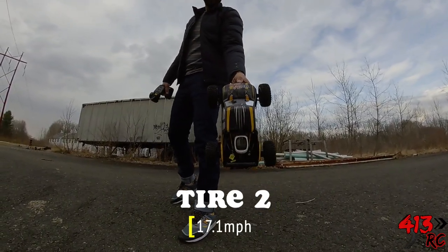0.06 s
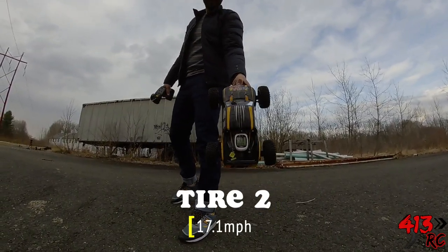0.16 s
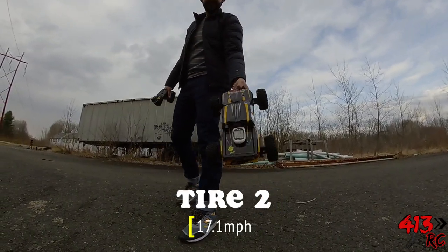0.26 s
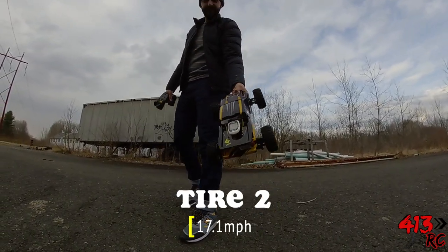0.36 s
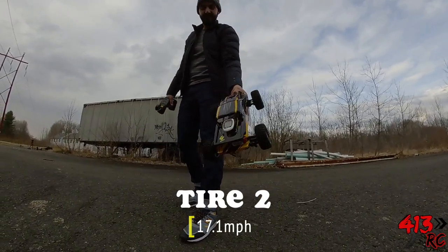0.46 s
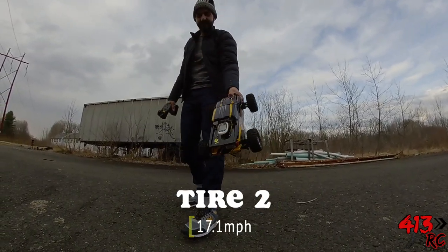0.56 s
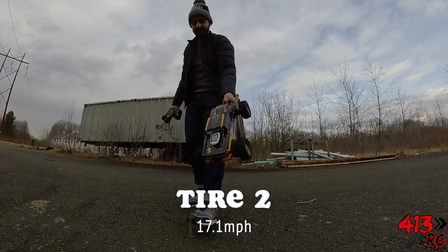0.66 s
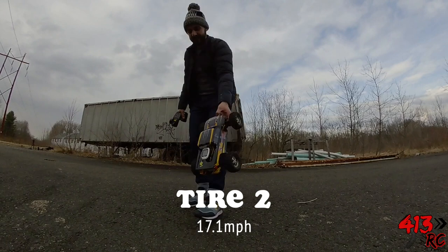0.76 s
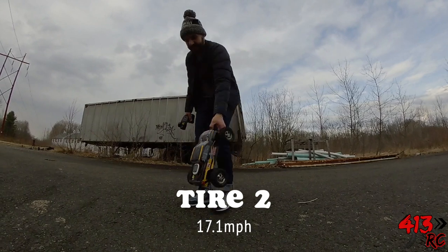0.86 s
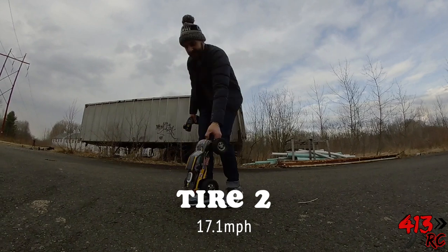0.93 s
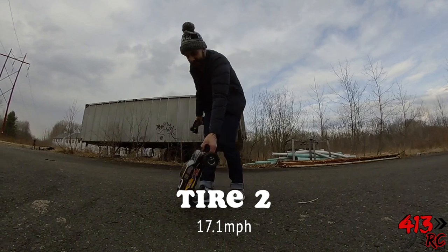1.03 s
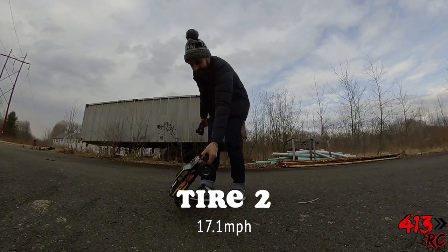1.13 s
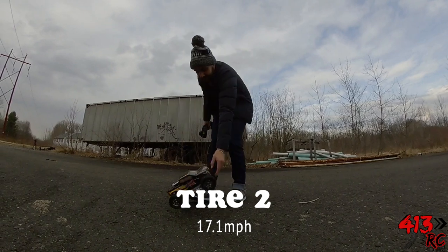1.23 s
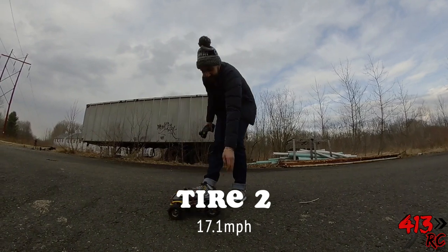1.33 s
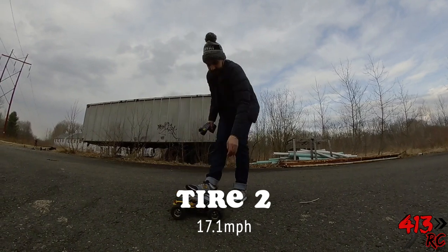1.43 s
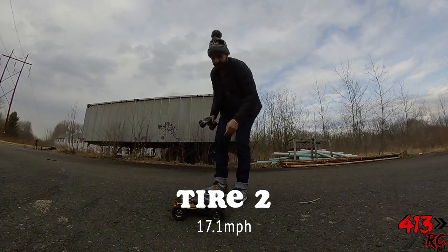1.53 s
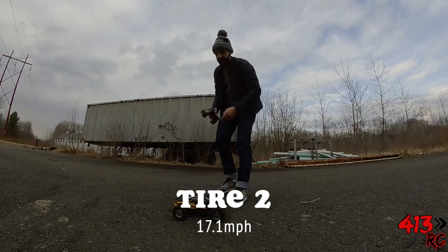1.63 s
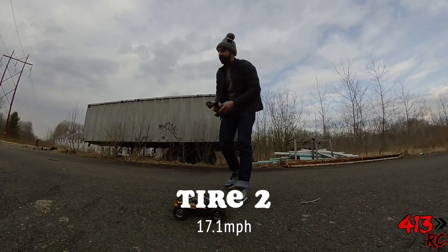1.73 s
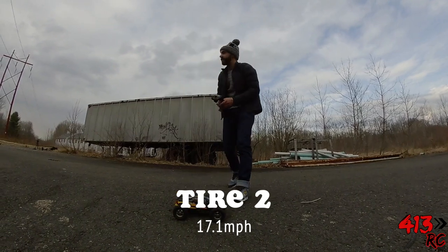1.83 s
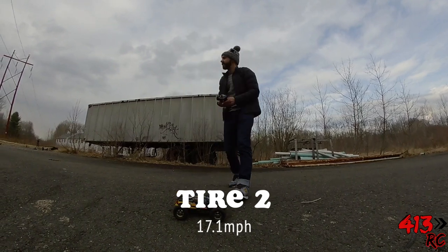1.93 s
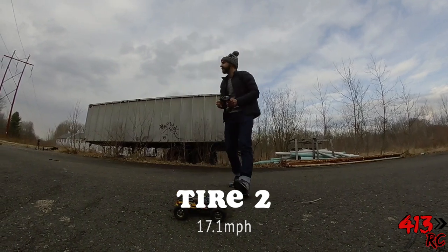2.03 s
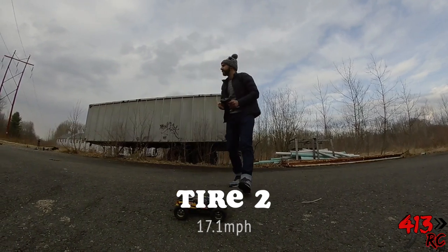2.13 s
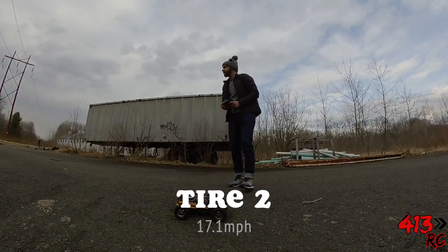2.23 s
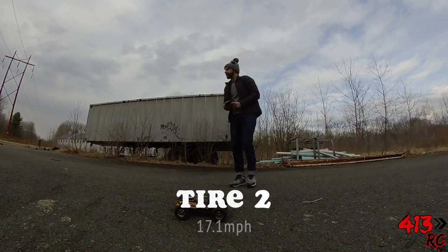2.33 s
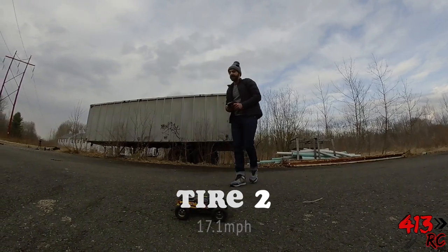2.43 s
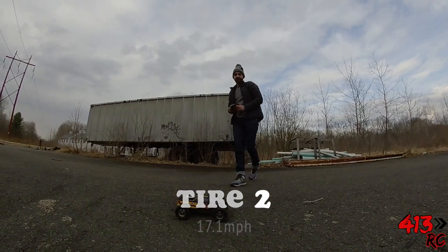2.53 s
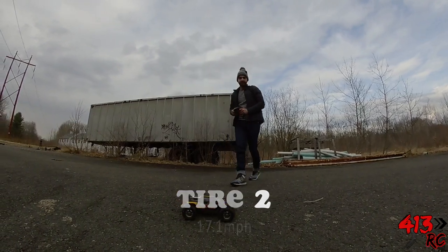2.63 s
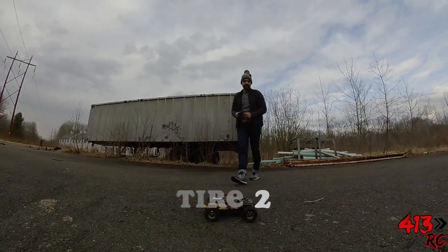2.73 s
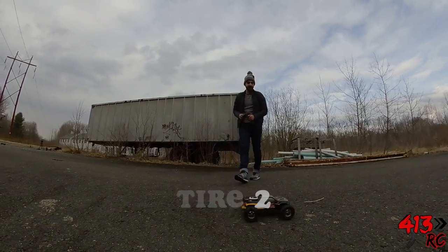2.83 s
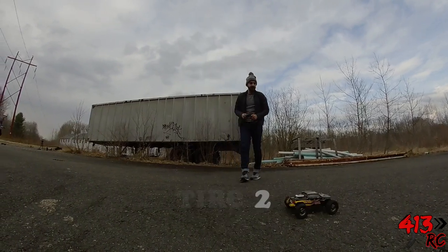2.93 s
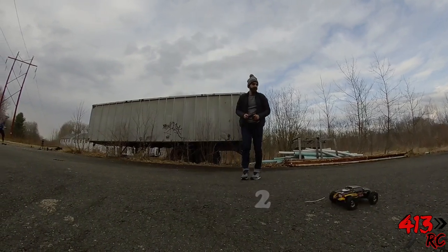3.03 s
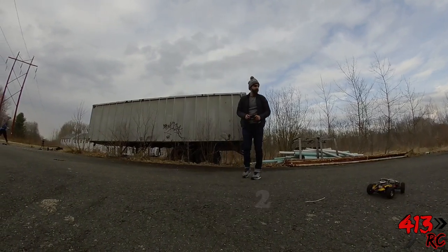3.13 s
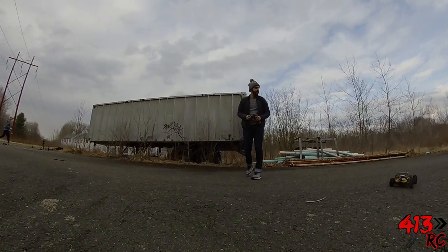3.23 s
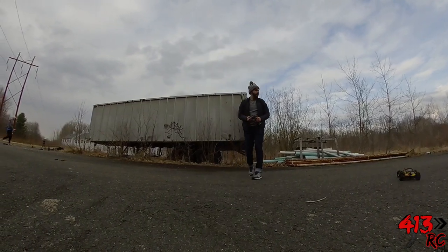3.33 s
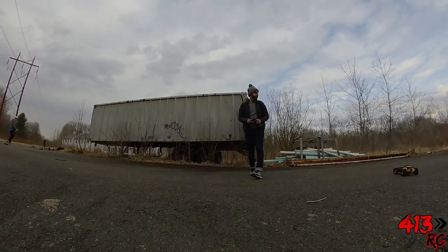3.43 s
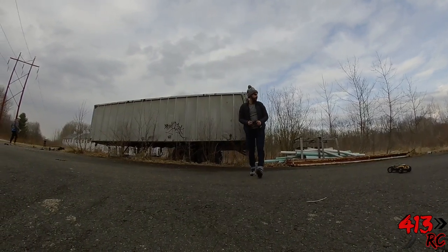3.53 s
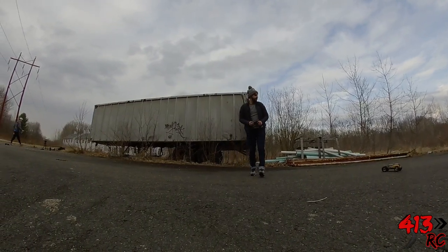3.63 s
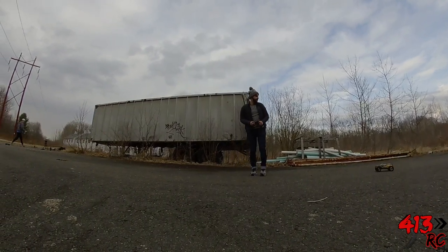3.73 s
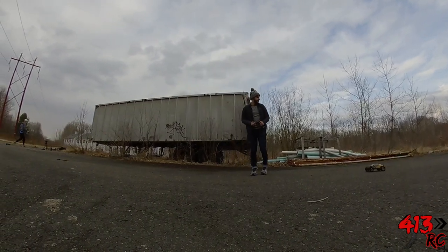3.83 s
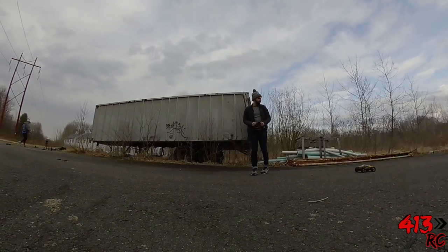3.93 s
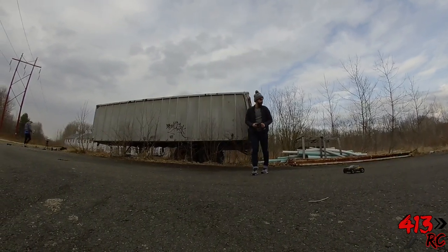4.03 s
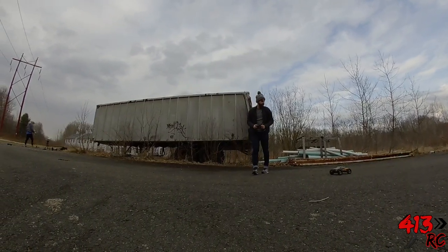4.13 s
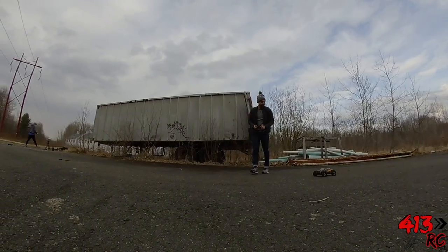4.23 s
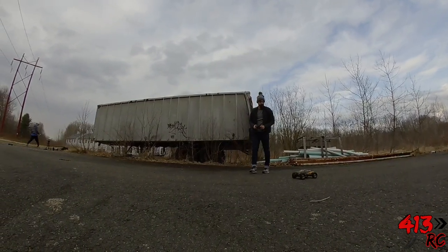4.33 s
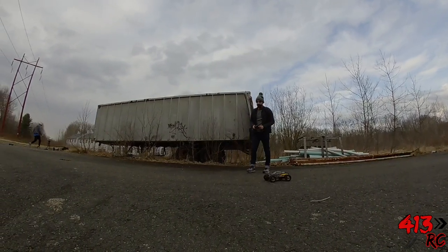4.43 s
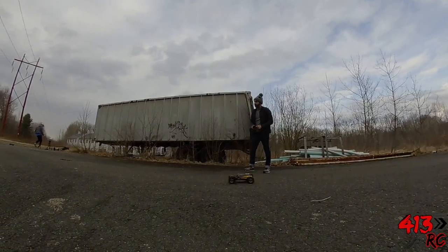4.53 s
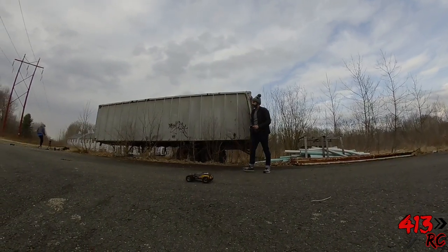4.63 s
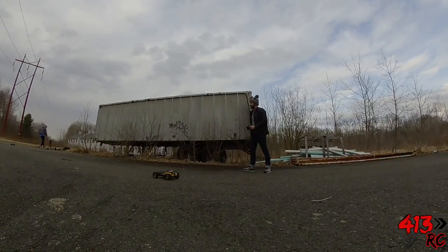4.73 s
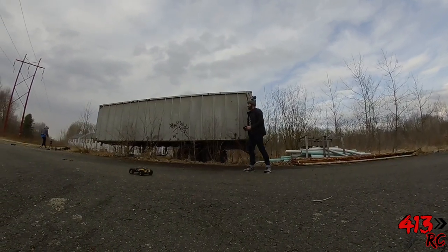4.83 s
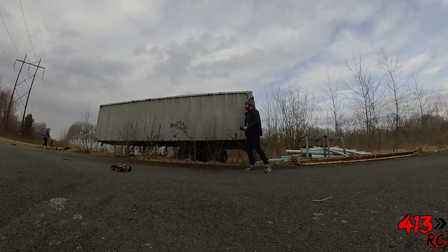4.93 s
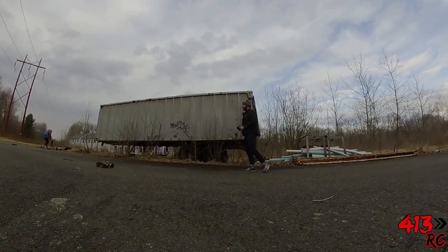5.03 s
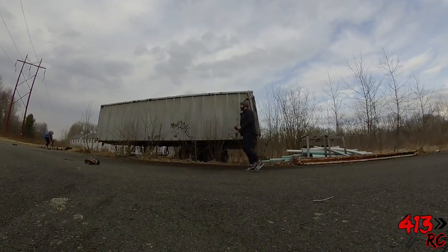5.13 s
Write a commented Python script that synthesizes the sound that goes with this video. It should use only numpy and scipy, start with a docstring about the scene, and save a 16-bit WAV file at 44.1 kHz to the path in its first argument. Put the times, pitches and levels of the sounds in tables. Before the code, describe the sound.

A small remote-controlled truck is dropped on its wheels, then its electric motor whines away in bursts over gritty asphalt.

```python
"""Outdoors on gritty asphalt, a radio-controlled truck is carried, dropped on its wheels and driven off.
Far traffic hums, the driver's jacket rustles and shoes crack grit. Loose plastic clacks, and the landing
rings the truck's frame. The brushless motor buzzes at standstill, then the gear teeth whine up, coast
through a turn and whine up again. The tyres roar, flick grit and thump over bumps."""
import sys
import numpy as np
from scipy.fft import rfft, irfft, next_fast_len
from scipy.io import wavfile
from scipy.ndimage import uniform_filter1d, map_coordinates

SR = 44100
rng = np.random.default_rng(int(sys.argv[2]) if len(sys.argv) > 2 else 0)


def store_pcm(level_fs):
    """Save levels as 16-bit WAV."""
    pcm = np.round(np.clip(level_fs, -1, 1) * 32767).astype(np.int16)
    wavfile.write(sys.argv[1], SR, np.atleast_2d(pcm).T)


N = 227688

# Tone colours: how strong the lows and highs of a sound are. Each row: frequency in Hz, level in dB.
TRAFFIC_TONE = [(100, -24.5), (200, 6.5), (270, 1.5), (340, 2.5), (600, -2), (1000, -1.5), (2000, -15.5),
                (4000, -62), (10000, -56)]
HUM_TONE = [(20, -28), (45, -16), (70, -8), (105, -13.5), (130, -7.5), (148, 0), (175, -4.5), (230, -11),
            (400, -29.5), (1000, -89)]
JACKET_TONE = [(800, -2.5), (2000, 2.5), (3500, -0.5), (5500, -4.5), (8300, 0.5), (10000, -9.5),
               (12500, -7), (13500, -25), (16000, -32)]
CLICK_TONE = [(300, -16), (1200, -0.5), (2200, 2.5), (4200, 4.5), (6000, -0.5), (8300, 3), (10500, -27),
              (14000, -36), (16000, -39)]
PLASTIC_TONE = [(40, -29), (150, -7), (500, -2.5), (1000, -10), (1400, 3), (1900, -5), (2400, -9),
                (2900, -6.5), (4000, -14), (8000, -17), (11000, -39), (14000, -23), (16000, -51)]
SOLE_TONE = [(40, -21), (100, -17), (260, 5.5), (600, 5.5), (1200, 0), (2500, -7), (4500, -11.5),
             (8000, -18), (12000, -32)]
THUD_TONE = [(25, -13), (70, -19), (130, -11), (350, 0.5), (520, 9), (740, 6.5), (1000, -4), (1500, -5),
             (3000, -14), (8500, -18), (11000, -37)]  # wheels and frame hitting the ground
SHELL_TONE = [(150, -25), (700, -8), (1300, 7), (1950, 2), (2600, -1), (3400, -2), (4300, -2.5),
              (6000, -10.5), (8500, -8.5), (11000, -31), (14200, -19), (16000, -26)]  # the plastic body
SUSPENSION_TONE = [(40, -45), (100, -10), (300, -3.5), (700, -3), (1000, 2.5), (1450, -1), (2000, -23),
                   (3800, -13.5), (5000, -34), (8500, -23), (12000, -38)]
JUDDER_TONE = [(60, -22), (150, 5.5), (300, -14), (480, 5), (800, -2), (1700, -10), (2800, -25),
               (8000, -32)]  # the frame shaken by the motor
GEARBOX_TONE = [(450, -26), (800, -6), (1130, 3), (1600, 4), (2000, -7.5), (2550, 1), (3200, 7),
                (4300, -28), (5100, -18), (5750, -11.5), (6400, -5), (7100, -10), (7900, 4), (9200, -4.5),
                (10200, -10), (11500, -25), (14200, -6), (18000, -47)]
TYRE_TONE = [(88, -47.5), (150, -14), (285, -13), (451, 1), (725, -7.5), (1100, -14.5), (1430, -31),
             (2420, -120)]
RATTLE_TONE = [(60, -48), (450, -14), (750, -1.5), (1100, 0), (1550, -1), (2100, -6), (2600, -9),
               (3100, -10), (4000, -18.5), (5200, -20), (7000, -29), (12000, -41.5)]  # the frame shaken by grit
HISS_TONE = [(100, -33), (3000, -3), (5000, -6.5), (6200, -2), (7200, 0.5), (8000, 3), (8800, -1.5),
             (10000, -16), (11700, -25.5), (13000, -15), (14000, -9), (15000, -22), (16000, -19)]  # the spinning drive parts
MICROPHONE_TONE = [(20, -10), (45, -16), (68, -21.5), (95, -11.5), (130, 0)]
# The tone colour of flying grit. Each row: multiple of the centre frequency, level in dB.
SPRAY_TONE = [(.1, -30), (.6, -16), (1, 6.5), (1.35, -9), (1.7, -24), (2.6, -21)]

# The notes a part rings at when struck. Each row: pitch in Hz, level in dB, seconds to fade by 60 dB.
PANEL_NOTES = [(1480, 0, .03), (2080, -3, .025), (2950, -9, .025)]
HEEL_NOTES = [(230, -2, 0.076), (333, 4, 0.049), (650, -12, .04)]
FRAME_NOTES = [(145, -0.5, 0.057), (259.4, -13, 0.18), (423, -7.5, 0.18), (605, 6.5, 0.041),
               (700, 2, 0.057), (825, 1.5, 0.041), (1252, -3.5, 0.1), (1435, -4, 0.052), (1650, 0, 0.04),
               (1930, 3, 0.024), (2200, -4.5, .04), (3380, -2.5, 0.025), (4400, -21, 0.049)]
LINK_NOTES = [(1640, 0, 0.033), (1730, -5, 0.037), (2680, -4, 0.032)]

# Single hits. Each row: start in seconds, level in dB.
SHARP_CLICKS = [(.082, -39), (.141, -41), (.277, -45), (.430, -41.5), (.468, -38), (.474, -39.5),
                (.662, -34.5), (.665, -39.5), (1.101, -42), (1.139, -47.5), (1.225, -44), (1.8996, -44.5),
                (1.951, -36.5), (1.9704, -39), (2.054, -38), (2.0585, -31.5)]  # grit underfoot and the carried truck's plastic
PLASTIC_CLACKS = [(1.003, -34.5), (1.225, -40), (1.8996, -40), (2.3675, -39), (2.91, -26), (3.5805, -22.5),
                  (3.667, -33), (3.734, -33), (4.916, -29.5), (5.054, -20.5)]
SHELL_SLAPS = [(1.378, -19.5), (1.3895, -21), (1.3915, -21.5), (1.4008, -21), (1.403, -20)]  # the body slaps the frame
MOTOR_JERKS = [(2.551, -35.5), (2.564, -36), (2.581, -39), (2.588, -34.5), (2.602, -37), (2.617, -35)]
TYRE_CRACKS = [(2.7252, -39), (2.7546, -35), (3.1946, -34), (3.2574, -37), (3.4934, -34), (3.8047, -30),
               (3.91, -21.5), (4.5909, -23), (4.7032, -39), (4.791, -42)]  # stones under tyres
TYRE_BUMPS = [(2.871, -22), (3.194, -20), (3.283, -24), (3.324, -24), (4.246, -23.5)]

# The jacket moves. Each row: middle in seconds, half length in seconds, level in dB.
JACKET_RUSTLES = [(-0, 0.029, -56), (0.718, 0.56, -62.5), (1.524, 0.19, -61.5), (1.779, 0.03, -59),
                  (1.983, 0.19, -63.5)]
# Shoes land. Each row: start in seconds, sole level in dB, heel level in dB.
FOOTSTEPS = [(1.265, -42.5, -68), (1.852, -44, -41.5), (2.072, -27, -45), (2.136, -41.5, -48)]
# Wheels and frame hit the ground. Each row: start in seconds, level in dB, extra ringing in dB.
LANDING_BLOWS = [(1.3545, -42, 9), (1.358, -32.5, 2), (1.3695, -24, 6.5), (1.378, -22, 5.5),
                 (1.3867, -18.5, 3), (1.3895, -17, 7), (1.3925, -14.5, 1.5), (1.4055, -25, 1),
                 (1.415, -21, -16), (1.44, -35, 2), (1.475, -41, 6)]
# The suspension knocks. Each row: start in seconds, level in dB, loss per bounce in dB.
SUSPENSION_KNOCKS = [(1.529, -33, 0.5), (2.722, -18.5, 9), (3.011, -22, 2), (3.766, -38, 2),
                     (3.9134, -18, 12), (4.177, -29, 6), (4.246, -32.5, 2)]

# The tones in the motor's buzz and the gears' rasp. Each row: multiple of the base pitch, level in dB.
COIL_HARMONICS = [(1, -5.5), (2, -17), (3, -27), (5, -18), (7, -29)]
RASP_HARMONICS = [(2, -2), (3, -5.5), (4, -4.5), (5, -6.5), (6, -8), (7, -8), (8, -7), (9, -16)]
# How often gear teeth meet as the truck starts, coasts and speeds up. Each row: time in seconds, rate in Hz.
TOOTH_RATE = [(2.61, 450), (2.64, 660), (2.675, 1180), (2.74, 1680), (2.81, 1880), (2.88, 2340),
              (2.955, 2690), (3.11, 2680), (3.3, 2000), (3.66, 1030), (3.695, 1150), (3.71, 1410),
              (3.80, 2060), (4.0, 2580), (4.17, 2680), (4.33, 2740), (4.46, 3000), (4.55, 3310),
              (4.8, 2730), (4.93, 3050), (5.16, 3350)]
# The truck's path. Each row: time in seconds, distance in metres.
TRUCK_PATH = [(2.6, 1.12), (2.85, 1.18), (3.05, 1.2), (3.3, 1.77), (3.65, 2.72), (4.0, 2.04), (4.3, 2.36),
              (4.55, 1.89), (4.8, 2.75), (5.16, 3.7)]
# Squeezes of the throttle. Each row: start in seconds, length in seconds, whine level in dB,
# its fade in dB per second, rasp level in dB.
SQUEEZES = [(2.632, .451, -29.5, 8, -37), (3.68, .88, -31.5, 5, -39.5), (4.804, .4, -34, 4, -37.5)]
# Spinning tyres grip and drag the motor down. Each row: middle in seconds, half length in seconds,
# share of speed lost, extra whine in dB.
TYRE_BITES = [(2.679, .012, .02, 6), (2.72, .0099, .099, 0.5), (2.757, .012, .13, 5.5),
              (2.829, .011, .17, 1), (2.849, .01, .08, 0), (2.892, .011, .15, 7.5), (2.924, .014, .15, 7.5),
              (2.974, .011, .15, 9.5), (3.015, .014, .10, 6), (3.06, .016, .068, 6.5),
              (3.731, .011, .17, 7), (3.774, .011, .17, 6), (3.816, .012, .13, 12.5),
              (3.889, .012, .15, 12.5), (3.934, .01, .11, 9), (3.968, .013, .13, 10.5),
              (4.015, .011, .11, 11), (4.066, .028, .04, 7.5), (4.114, .02, .087, 9),
              (4.237, .025, .038, 4), (4.333, .012, .061, 8.5)]
# Wheels lift and the gears go quiet. Each row: middle in seconds, half length in seconds, change in dB.
WHEEL_LIFTS = [(3.86, .012, -4), (4.15, 0.013, -5), (4.288, 0.018, -6), (4.376, 0.019, 0), (4.55, .07, -7),
               (4.868, 0.031, -8), (5.12, .04, -3)]
# Rough ground and turns. Each row: middle in seconds, half length in seconds, roar change in dB,
# rattle change in dB.
ROUGH_PATCHES = [(2.795, 0.031, 2, 5.5), (3.17, 0.11, 1, 0.5), (3.505, 0.11, 2, 3.5), (3.981, 0.22, -5, 2),
                 (4.575, 0.065, 4.5, 6.5)]
# Tyres throw grit. Each row: middle in seconds, half length in seconds, level in dB, centre frequency in Hz.
GRIT_SPRAYS = [(2.858, .03, -50, 5950), (2.925, 0.017, -43, 6400), (3.195, 0.01, -38.5, 7200),
               (3.26, 0.0085, -47.5, 5900), (3.377, 0.25, -53, 5800), (3.508, 0.011, -52, 5900),
               (4.05, 0.023, -47.5, 5850), (4.373, 0.0098, -45.5, 5460), (4.441, 0.046, -50.5, 4680),
               (4.672, 0.01, -41, 7400), (5.144, 0.062, -45.5, 7130)]

ROLL_S, ROLL_RISE_S = 2.646, 0.082  # the wheels get going
CRUISE_HZ = 2504  # the tooth rate that counts as speed 1


def amp(db):
    """Turn decibels into a number to multiply a sound by."""
    return 10 ** (np.asarray(db) / 20)


def unit(x):
    """Scale a sound so its average strength (rms) is 1."""
    return x / np.sqrt(np.mean(x ** 2) + 1e-20)


def along(points, hz):
    """Read a tone colour's level in dB at any frequency."""
    freqs, levels = np.transpose(points)
    return np.interp(np.log(hz + 1), np.log(freqs + 1), levels)


def curve(rows):
    """Join (time, value) points with straight lines, one value per sample."""
    return np.interp(np.arange(N) / SR, *np.transpose(rows))


def wobble(rate):
    """A smooth random curve with `rate` new values a second."""
    return map_coordinates(rng.standard_normal(N // 8), [np.arange(N) * rate / SR], mode="wrap")


def gate(s, length, attack, release):
    """Fade in, hold from time s, fade out; attack and release are seconds per tenfold change."""
    t = np.arange(N) / SR
    return 10 ** (np.minimum(t - s, 0) / attack - np.maximum(t - s - length, 0) / release)


def swell(s, width):
    """A bell-shaped rise and fall around time s."""
    return np.exp(-((np.arange(N) / SR - s) / width) ** 2)


def coloured(x, tone):
    """Filter a sound to give it a tone colour."""
    size = 2 * next_fast_len(N // 2 + 8192)
    gain = unit(amp(along(tone, np.fft.rfftfreq(size, 1 / SR))))
    # these steps make the filter ring only after a hit, never before it
    cepstrum = irfft(np.log(np.maximum(gain, 1e-6)))
    cepstrum[1:size // 2] *= 2
    cepstrum[size // 2 + 1:] = 0
    return irfft(rfft(x, size) * np.exp(rfft(cepstrum)))[:N]


def noise(tone):
    """Steady noise with a tone colour, at strength 1."""
    return unit(coloured(rng.standard_normal(N), tone))


def grains(rate, spread_db):
    """Tiny random clicks of uneven size, about `rate` a second."""
    hit = rng.random(N) < rate / SR
    return unit(hit * rng.choice([-1, 1], N) * amp(spread_db * np.minimum(rng.exponential(size=N), 4)))


def add(track, s, sound):
    """Mix a sound in at time s."""
    part = track[round(s * SR):][:len(sound)]
    part += sound[:len(part)]


def contacts(rows, tone, t60, tail_db, tail_t60, snap):
    """Each hit is a snap, a burst of noise and a faint tail; t60 is the seconds to fade by 60 dB."""
    track, t = np.zeros(N), np.arange(SR // 2) / SR
    for s, db, *_ in rows:
        fade = amp(-60 * t / t60) + amp(tail_db - 60 * t / tail_t60)
        burst = fade * rng.standard_normal(len(t))
        add(track, s, amp(db) * (snap * (t == 0) + burst))
    return coloured(track, tone)


def bounces(s, db, gap, loss_db, count):
    """List quick, slightly uneven hits, each weaker than the last."""
    return [(s + gap * (k + rng.uniform(-.25, .25) * (k > 0)), db - loss_db * k) for k in range(count)]


def tap(s, db, notes, rise):
    """One tap makes a part ring at its own fading notes."""
    age = np.maximum(np.arange(N) / SR - s, 0)
    ring = sum(amp(level - 60 * age / t60) * np.sin(2 * np.pi * hz * age) for hz, level, t60 in notes)
    return amp(db) * (1 - np.exp(-age / rise)) * ring


def distance_db():
    """The farther away the truck is, the quieter it sounds."""
    return -20 * np.log10(np.maximum(curve(TRUCK_PATH), .5))


def traffic():
    """Far traffic makes a soft rush with a throbbing low hum."""
    rush = amp(-61 + 0.5 * wobble(25)) * noise(TRAFFIC_TONE)
    hum = amp(-60 + 0.97 * wobble(16)) * noise(HUM_TONE)
    return rush + hum


def jacket(resting_db=-68):
    """A padded jacket creases and rustles, louder when the driver moves."""
    creases = grains(200, spread_db=4) + 2.5 * rng.standard_normal(N)
    moves = sum(amp(db) * swell(s, width) for s, width, db in JACKET_RUSTLES)
    level = np.hypot(amp(resting_db), moves) * amp(0.15 * wobble(24.2))
    return level * unit(coloured(creases, JACKET_TONE))


def sharp_clicks():
    """Grit underfoot and the carried truck's plastic make sharp clicks."""
    return amp(-8.5) * contacts(SHARP_CLICKS, CLICK_TONE, t60=0.01, tail_db=-11.5, tail_t60=0.14, snap=3.8)


def loose_plastic():
    """The body clatters as the truck is swung down; loose parts clack and ring the panels."""
    clatter = bounces(s=.9355, db=-26.5, gap=0.005, loss_db=0.3, count=10)
    hits = PLASTIC_CLACKS + clatter
    clacks = contacts(hits, PLASTIC_TONE, t60=0.033, tail_db=-27, tail_t60=0.79, snap=1.6)
    panels = sum(tap(s, db, PANEL_NOTES, rise=.0005) for s, db in PLASTIC_CLACKS)
    return amp(-13.5) * clacks + amp(-11) * panels


def shoes():
    """Soles land and heels thump the ground."""
    soles = contacts(FOOTSTEPS, SOLE_TONE, t60=0.019, tail_db=-24, tail_t60=0.23, snap=10.8)
    heels = sum(tap(s, db, HEEL_NOTES, rise=0.0022) for s, _, db in FOOTSTEPS)
    return amp(-7.5) * soles + heels


def landing(tyre_give_s=0.00066):
    """The wheels land one by one and ring the frame; the body slaps down as the springs run out."""
    ring, t = np.zeros(N), np.arange(SR // 2) / SR
    hz, level, t60 = np.transpose(FRAME_NOTES)[:, :, None]
    soft_start = 1 - np.exp(-t / tyre_give_s)  # rubber softens each blow
    for s, db, extra_db in LANDING_BLOWS:
        strength, detune, side = rng.standard_normal((3, len(FRAME_NOTES), 1))
        fades = amp(level + 2 * strength - 60 * t / t60)
        notes = np.sign(side) * fades * np.sin(2 * np.pi * hz * (1 + 0.018 * detune) * t)
        add(ring, s, amp(db + extra_db) * soft_start * notes.sum(axis=0))
    thuds = contacts(LANDING_BLOWS, THUD_TONE, t60=0.03, tail_db=-16, tail_t60=0.15, snap=0.74)
    slaps = contacts(SHELL_SLAPS, SHELL_TONE, t60=0.032, tail_db=-14, tail_t60=0.19, snap=1.0)
    return amp(-14) * ring + amp(-7) * (thuds + slaps)


def suspension():
    """Each knock of the suspension is four quick bounces."""
    hits = []
    for s, db, loss_db in SUSPENSION_KNOCKS:
        hits += bounces(s, db, gap=0.0045, loss_db=loss_db, count=4)
    return amp(-8.5) * contacts(hits, SUSPENSION_TONE, t60=0.03, tail_db=-18.5, tail_t60=0.23, snap=5.8)


def steering_link():
    """The steering link ticks as it takes up its slack."""
    return tap(s=2.368, db=-46, notes=LINK_NOTES, rise=0.00036)


def motor_start(start_s=2.525, end_s=2.71, coil_hz=1114, sag_hz_per_s=250, ring_hz=1110):
    """Pulsed coils sing while the motor jerks against the gears, ringing them and shaking the frame."""
    age = np.maximum(np.arange(N) / SR - start_s, 0)
    phase = 2 * np.pi * np.cumsum(coil_hz - sag_hz_per_s * age) / SR
    level = amp(-45 - 45 * age) * gate(start_s + 0.017, end_s - start_s, attack=0.021, release=.02)
    stutter = amp(5 * wobble(120))
    sound = level * stutter * np.sqrt(2) * sum(amp(db) * np.sin(k * phase) for k, db in COIL_HARMONICS)
    t = np.arange(SR // 8) / SR
    ring = amp(7 - 60 * t / 0.023) * (1 - np.exp(-t / 0.0015)) * np.sin(2 * np.pi * ring_hz * t)
    for s, db in MOTOR_JERKS:
        add(sound, s, amp(db) * ring)
    judder = contacts(MOTOR_JERKS, JUDDER_TONE, t60=0.028, tail_db=-22, tail_t60=0.13, snap=1.6)
    return sound + amp(-11) * judder


def tooth_load(rasp_lag_s=0.062):
    """Whine and rasp levels in dB: each squeeze presses the teeth, less as the truck catches up."""
    t = np.arange(N) / SR
    whine, rasp = np.full((2, N), 1e-6)
    for s, length, db, fade_db, rasp_db in SQUEEZES:
        whine += amp(db - fade_db * (t - s)) * gate(s, length, attack=0.094, release=0.049)
        rasp += amp(rasp_db) * gate(s + rasp_lag_s, length, attack=0.11, release=0.038)
    return 20 * np.log10([whine, rasp]) + distance_db()


def grip_db(speed, lead_s=.008, hop_lag_s=0.025):
    """The whine grows when the tyres bite, and drops when they slip, hop or lift."""
    slip = -7.5 * speed ** 2
    bites = sum(db * swell(s - lead_s, width) for s, width, _, db in TYRE_BITES)
    hops = -3.5 * sum(swell(s + hop_lag_s, 0.0034) for s, *_ in TYRE_BITES)
    lifts = sum(db * swell(s, width) for s, width, db in WHEEL_LIFTS)
    return slip + bites + hops + lifts


def gear_whine(flutter_db=2.5, rasp_db_per_octave=9):
    """Meeting teeth make a tone that the gearbox colours; their chatter smears its overtones to a rasp."""
    drag = sum(share * swell(s, width) for s, width, share, _ in TYRE_BITES)
    steady_hz = uniform_filter1d(curve(TOOTH_RATE), size=300) * (1 - drag)
    speed = steady_hz / CRUISE_HZ
    load_db, chatter_db = tooth_load()
    # bumps shake the pitch and the level, more so at speed
    hz = steady_hz * (1 + speed ** 2 * (.009 * wobble(70) + .012 * wobble(900)) + .012 * wobble(400))
    rough_db = 3.2 * wobble(300) + flutter_db * np.minimum(speed, 1) * wobble(70)
    phase = 2 * np.pi * np.cumsum(hz) / SR
    # the second harmonic grows with load; at speed the third takes over
    second_db = -7 + .7 * (load_db + 31) - 10 * np.maximum(speed - .7, 0)
    third_db = -6 + 16 * np.minimum(np.log2(speed / 0.82), 0)
    harmonics = [(1, 0), (2, second_db), (3, third_db)]
    tones = sum(amp(db + along(GEARBOX_TONE, k * hz)) * np.sin(k * phase) for k, db in harmonics)
    whine = amp(load_db + grip_db(speed) + rough_db) * tones
    off_centre = 1 + .35 * np.sin(phase / 13 + wobble(25))  # the gears press harder once a turn
    rasp = np.zeros(N)
    for k, db in RASP_HARMONICS:
        width_hz = 14 * k ** 3.1  # higher overtones smear wider
        smear = wobble(width_hz) * np.sin(k * phase) + wobble(width_hz) * np.cos(k * phase)
        rasp += amp(db + along(GEARBOX_TONE, k * hz)) * smear
    rasp_db = chatter_db + rasp_db_per_octave * np.log2(speed) + 0.5 * wobble(40)
    return off_centre * (whine + amp(rasp_db) * rasp)


def rolling():
    """Tread roars on the asphalt, grit rattles the frame and the drive parts hiss."""
    speed = curve(TOOTH_RATE) / CRUISE_HZ
    octaves, far_db = np.log2(speed), distance_db()  # one octave is a doubling of speed
    speeding_up = np.clip(np.gradient(uniform_filter1d(speed, size=4000)) * SR, 0, 1)
    patches_db = sum(np.outer(changes, swell(s, width)) for s, width, *changes in ROUGH_PATCHES)
    tyres_db, frame_db = far_db + patches_db
    bumps_db = 1.3 * wobble(50)
    roar = amp(-35.5 + 3.5 * octaves + tyres_db + bumps_db) * noise(TYRE_TONE)
    shaking = grains(900 * speed, spread_db=2.0) + 1.1 * rng.standard_normal(N)
    rattle_db = -38 - 0.5 * octaves + 1.5 * speeding_up + frame_db + bumps_db
    rattle = amp(rattle_db) * unit(coloured(shaking, RATTLE_TONE))
    fizz = grains(900 * speed, spread_db=-0.5) + 2 * rng.standard_normal(N)
    hiss_db = -43.5 + 5.5 * octaves + 0.53 * far_db + .5 * bumps_db + wobble(60)
    hiss = amp(hiss_db) * unit(coloured(fizz, HISS_TONE))
    return gate(ROLL_S + 0.01, N / SR, attack=ROLL_RISE_S, release=1) * (roar + rattle + hiss)


def pebbles():
    """Once the truck is moving, the tyres flick stones against its plastic body."""
    flicks = unit(coloured(grains(25, spread_db=2.5), PLASTIC_TONE))
    moving = gate(ROLL_S + ROLL_RISE_S, N / SR, attack=0.033, release=1)
    return amp(-47 + distance_db()) * moving * flicks


def grit_spray():
    """Slipping tyres throw short showers of crackling grit and crack single stones."""
    crackle = grains(1500, spread_db=2.5) + .3 * rng.standard_normal(N)
    showers = np.zeros(N)
    for s, width, db, hz in GRIT_SPRAYS:
        tone = np.multiply(SPRAY_TONE, [hz, 1])
        showers += amp(db) * swell(s, width) * unit(coloured(crackle, tone))
    cracks = contacts(TYRE_CRACKS, CLICK_TONE, t60=0.006, tail_db=-22, tail_t60=.08, snap=1.6)
    return showers + amp(-10) * cracks


def tyre_thumps():
    """The tyres thump over bumps."""
    return amp(-9) * contacts(TYRE_BUMPS, TYRE_TONE, t60=0.032, tail_db=-20, tail_t60=.1, snap=2.7)


def scene():
    """Truck, driver and traffic in the open air, mixed to one channel."""
    driving = motor_start() + gear_whine() + rolling() + pebbles() + grit_spray()
    knocks = landing() + loose_plastic() + suspension() + steering_link() + tyre_thumps()
    return (driving + knocks + sharp_clicks() + shoes() + traffic() + jacket())[None]


def record(dry, top_hz=15750):
    """The microphone weakens the bass, and the highest treble is cut off."""
    size = next_fast_len(N + SR // 4)
    hz = np.fft.rfftfreq(size, 1 / SR)
    gain = amp(along(MICROPHONE_TONE, hz)) * (hz < top_hz)
    return irfft(rfft(dry, size) * gain, size)[:, :N]


dry = scene()
out = record(dry)
store_pcm(out)
```